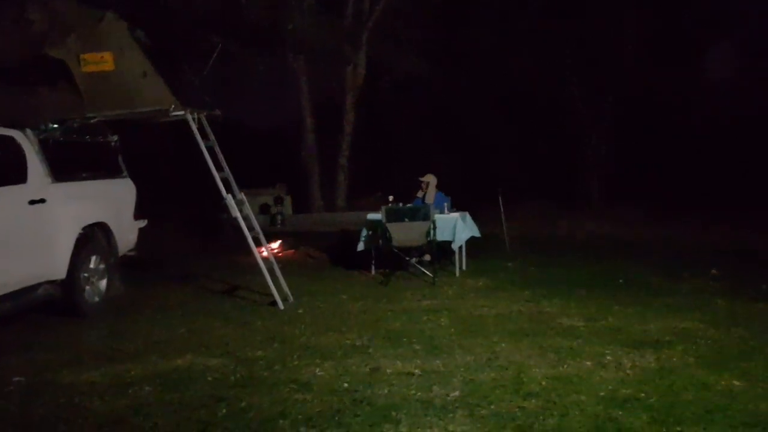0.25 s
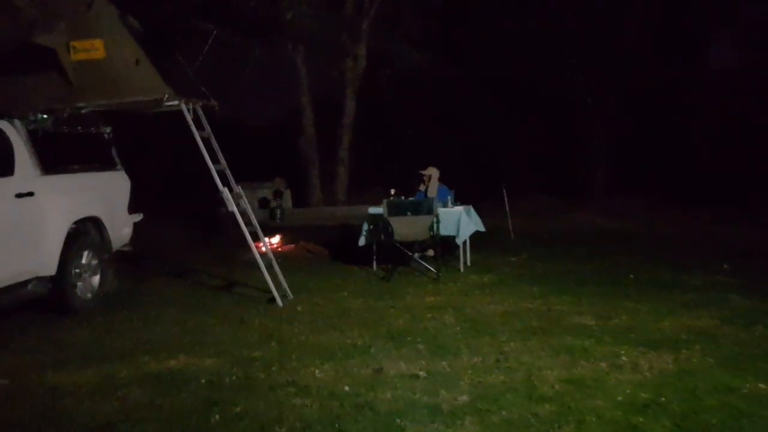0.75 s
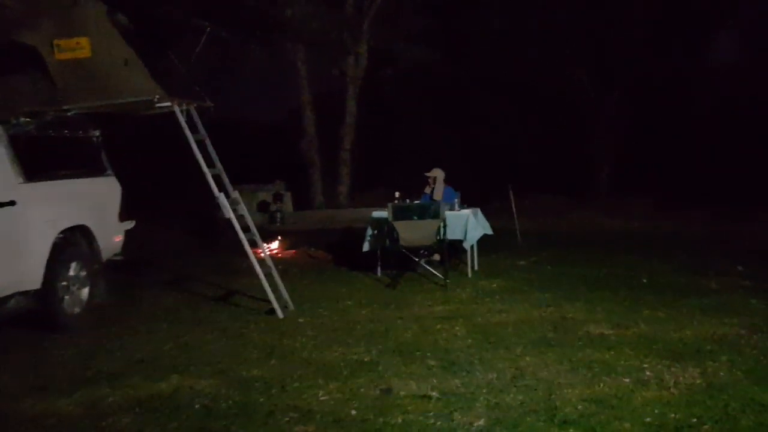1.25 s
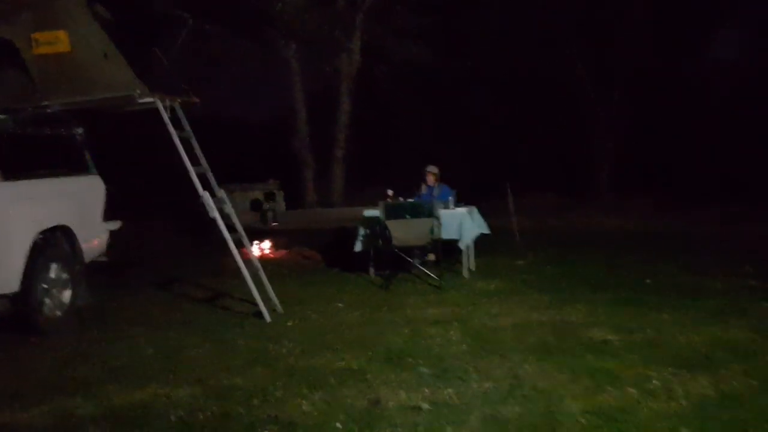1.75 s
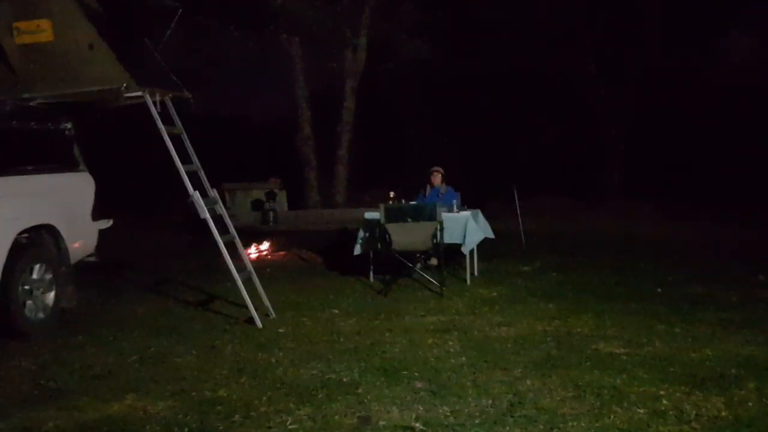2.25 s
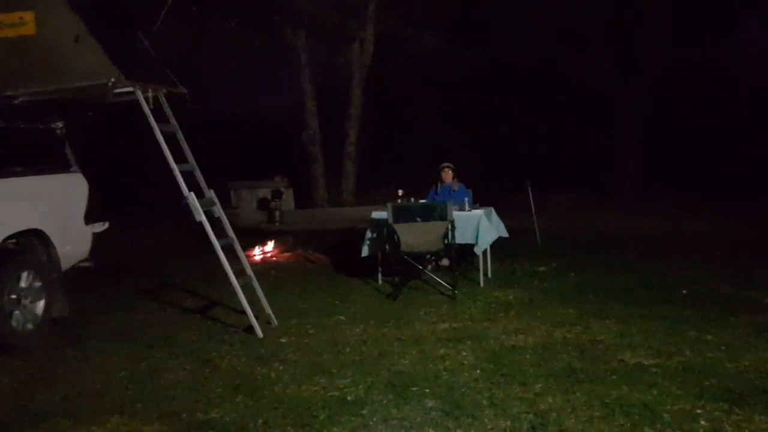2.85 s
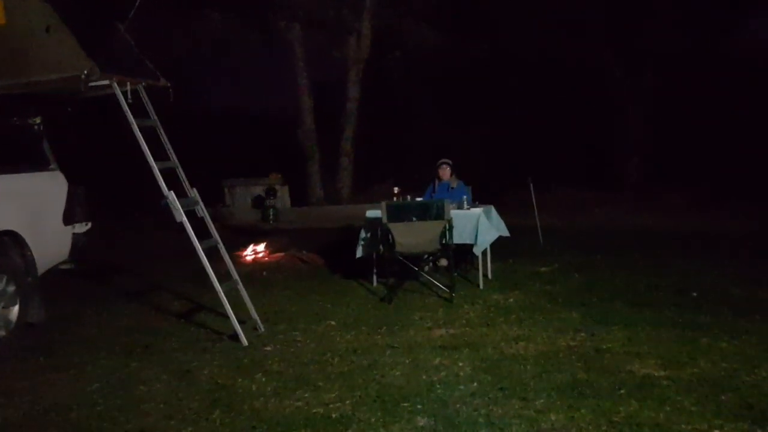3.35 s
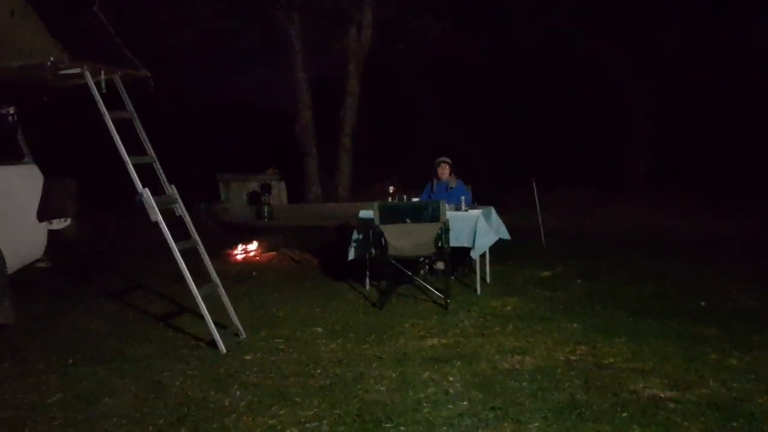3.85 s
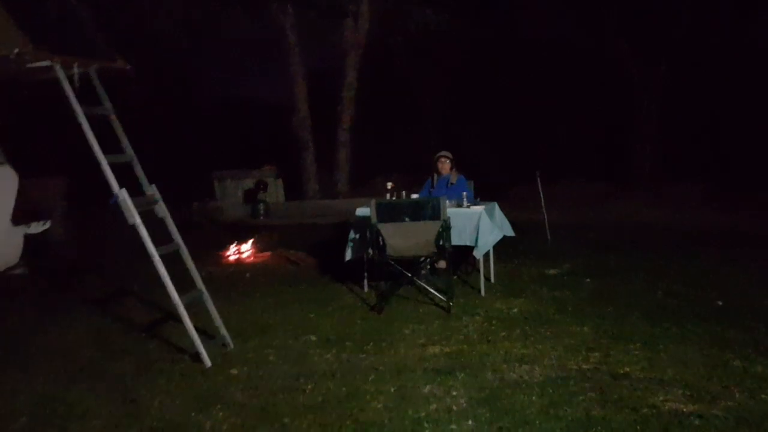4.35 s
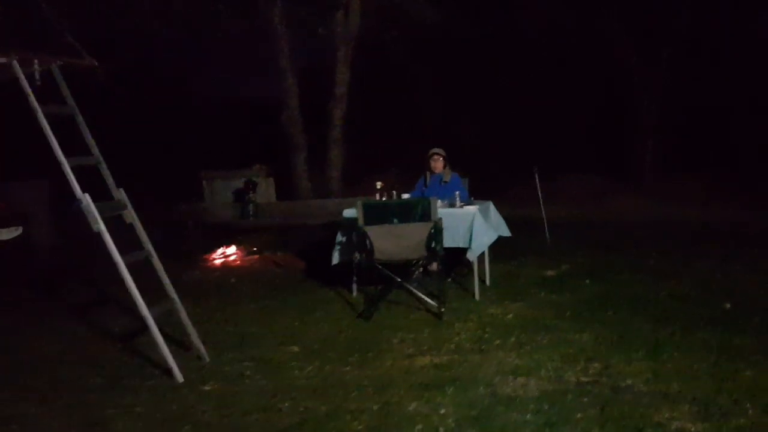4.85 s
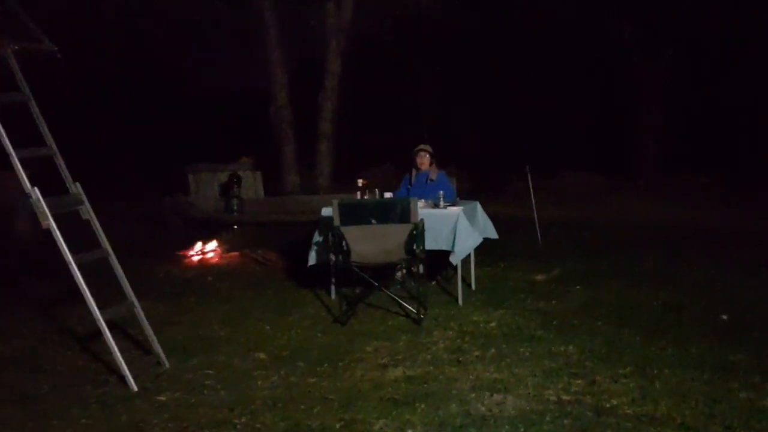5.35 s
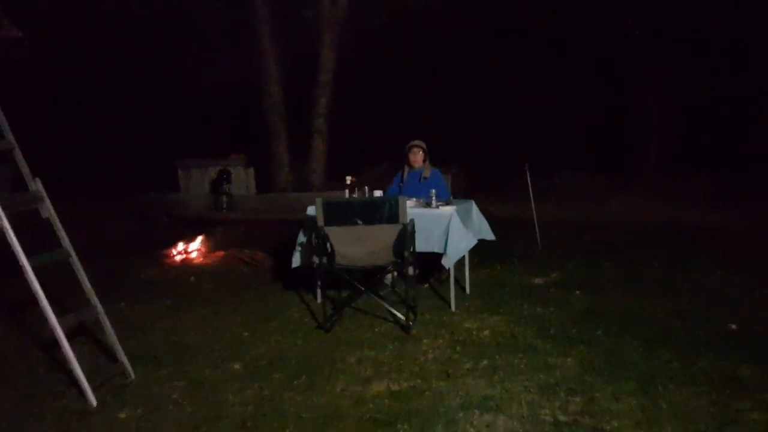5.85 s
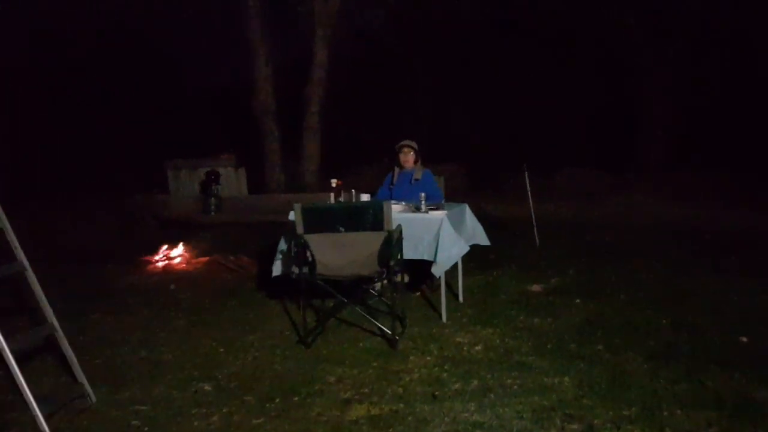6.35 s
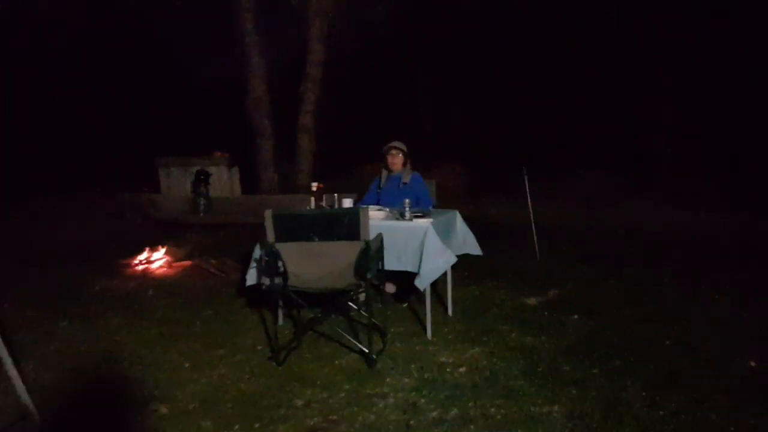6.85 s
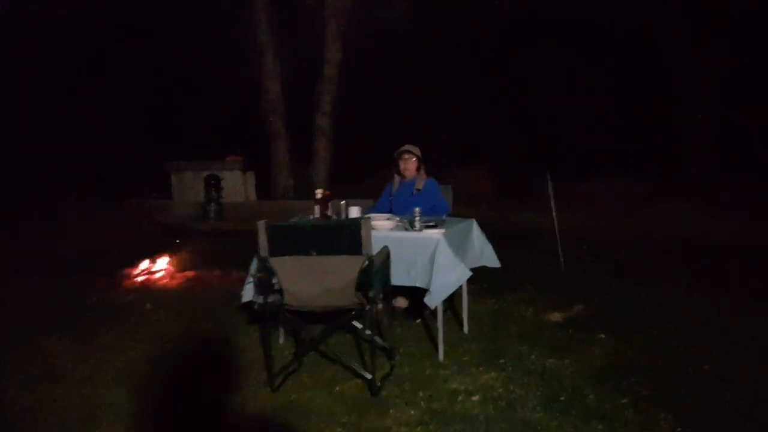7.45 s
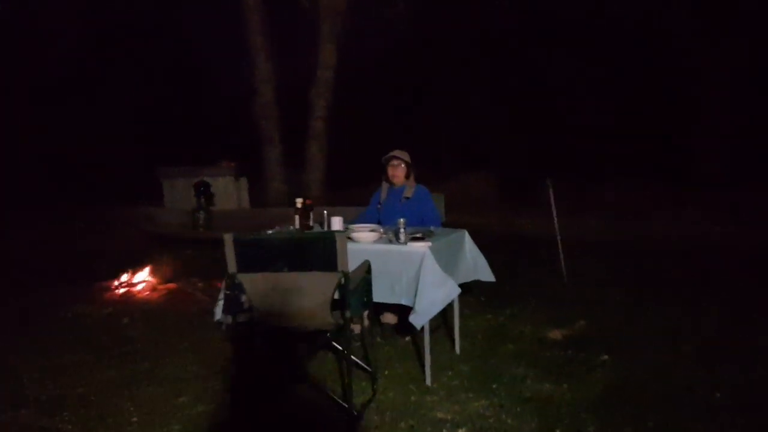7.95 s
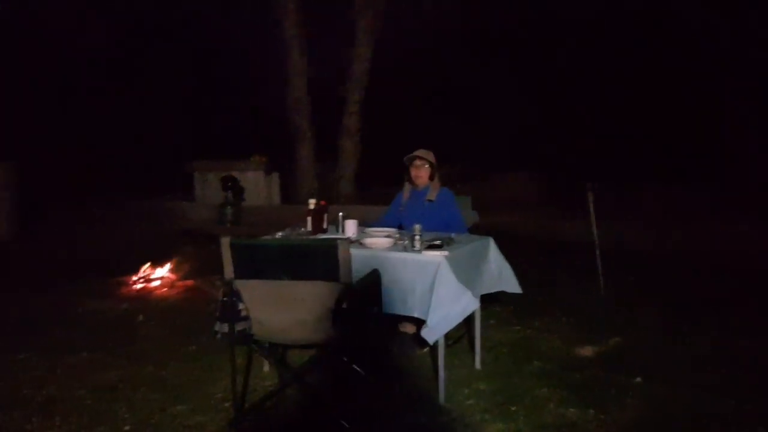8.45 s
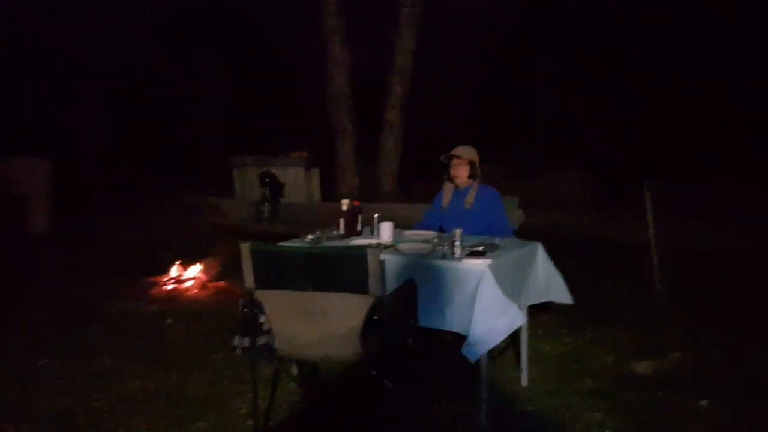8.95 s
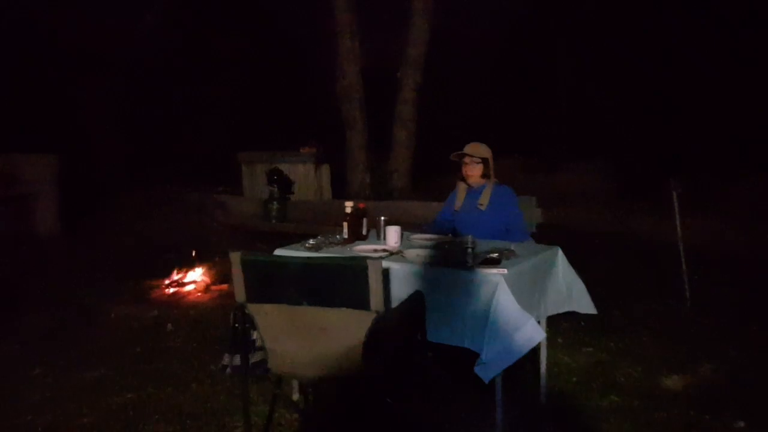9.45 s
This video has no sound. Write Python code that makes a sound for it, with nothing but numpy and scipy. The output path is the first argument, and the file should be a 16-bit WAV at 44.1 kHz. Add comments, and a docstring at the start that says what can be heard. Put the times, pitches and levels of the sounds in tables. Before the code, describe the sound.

Moving handheld stereo perspective in open grass near trees and a parked truck. Cricket song dominates: one close, steady, fast chirr with downward-sweeping strokes swells, leans left and recedes; a second gives roughly one trill burst per second until about five seconds. Regular soft chirps and a shimmering insect bed fill the night. Beneath are quiet irregular grass steps, occasional dry stalk clicks, small knocks and a very faint low engine hum.

```python
"""A near cricket sweeps its wings without pause as a listener walks past it on a lawn at a night camp in the bush.
Its fast falling tones reach both ears directly, off the ground and off a parked truck.
Another cricket trills in bursts of longer strokes; field crickets chirp, and random strokes make a chorus.
Noise grains make the grass rustle, short bursts snap, and decaying rings knock underfoot.
Far off a generator hums in wavering sines and puffing noise, over a bed of shaped night noise."""
import sys
import numpy as np
from scipy import signal
from scipy.fft import rfft, irfft
from scipy.io import wavfile
from scipy.ndimage import uniform_filter1d

SR = 44100
rng = np.random.default_rng(int(sys.argv[2]) if len(sys.argv) > 2 else 0)


def store_pcm(level_fs):
    """Save levels as 16-bit WAV."""
    pcm = np.round(np.clip(level_fs, -1, 1) * 32767).astype(np.int16)
    wavfile.write(sys.argv[1], SR, np.atleast_2d(pcm).T)


N = 427329

# Near cricket along the walk, before patchiness: (time [s], left level [dB], right level [dB],
# left late-minus-early stress [dB], right late-minus-early stress [dB])
NEAR_PATH = [(0.05, -36.5, -34, -4, -12), (.65, -36.5, -30.5, 0, -11.5), (.9, -35, -32, 2, -20),
             (1.15, -38, -26.5, 22, -11), (1.55, -37.5, -31.5, 15, -14.5), (1.899, -33.5, -30.5, 10, -9.5),
             (2.5, -29.5, -30.5, -8, -5), (2.95, -27, -29, 0, -11), (3.4, -30.5, -34.5, -5.5, 15),
             (3.85, -29.5, -28, -5, -4), (4.4, -26.5, -34.5, -7.5, 10), (4.8, -28, -32.5, -8, 10),
             (5.4, -26.5, -31, -1, -3.5), (5.8, -23.5, -39, -6.5, -9), (6.1, -23, -38, -8, 8),
             (6.4, -21.5, -48, -4.5, 13), (6.8, -27, -30.5, 4.5, 12), (7.3, -31, -36.5, -14, 10.5),
             (7.75, -33.5, -41, -6.5, 21), (8.05, -35, -29.5, -9, 0), (8.4, -40, -42, -14, 3.5),
             (9, -38, -41.5, -11, 10), (9.4, -43, -39.5, -10, 5), (9.69, -48, -53, -15, -4)]
# Near cricket's bounce off the ground: (time [s], delay [ms], level relative to direct sound [dB])
GROUND_BOUNCE = [(0, 4.5, -20), (1, 3.2, -14.5), (2.5, 2.3, -14), (3.5, 2.3, -10), (4.5, 3.6, -10),
                 (6, 1.2, -32), (7, 2.9, -7.5), (9.7, 1.5, -17)]
# Near cricket's echo off the parked truck: (time [s], delay [ms], level relative to direct sound [dB])
TRUCK_ECHO = [(0, 11, -14), (2.5, 12.5, -15), (5, 14.5, -17), (7, 16, -14), (8.5, 19, -11), (9.7, 20, -13)]
# Near cricket's beat before jitter, even in between: (stroke number [count], start [s])
NEAR_BEAT = [(0, .0345), (24, 1.0183), (48, 2.0022), (72, 2.988), (96, 3.9697), (120, 4.953), (144, 5.9388),
             (156, 6.4335), (168, 6.9265), (192, 7.9113), (216, 8.8968), (229, 9.43), (233, 9.573),
             (235, 9.654)]
# Quick, shallow strokes: (first stroke number [count], stroke number after the last [count])
FALTER_STROKES = (229, 233)
BEAT_JITTER_S = .0005  # standard deviation
FALL, FALTER_FALL = 0.24, 0.115  # share by which the pitch falls in a stroke
PATCH_DB, PATCH_RATE_HZ = 4, 7  # depth before smoothing, new levels per second
# Near cricket's second harmonic, before its fade and pan: (time [s], level [dB])
SECOND_HARMONIC = [(0, -61), (.6, -48.5), (2.25, -53), (3.45, -41.5), (4.3, -45.5), (5.45, -48), (5.9, -40),
                   (6.4, -40), (6.65, -43.5), (7.1, -38.5), (7.5, -46), (8.05, -54), (8.5, -49.5),
                   (9.45, -57), (9.69, -75)]
# Near cricket's direction: (time [s], left lag behind right [ticks])
NEAR_BEARING = [(0, 176), (1.45, 275), (1.65, 412), (3.5, 427), (5.75, 378), (6.45, 603), (9.7, 538)]
# Ear-lag ticks, each close to a microsecond
NEAR_TICKS_PER_S, TRILL_TICKS_PER_S, CHIRP_TICKS_PER_S = 999500.0, 1040000.0, 936000.0

# Trilling cricket's bursts: (start [s], span from first to last stroke start [s])
TRILL_BURSTS = [(-.296, 0.75), (0.805, .674), (1.805, .745), (2.849, 0.69), (3.821, .735), (4.779, 0.47)]
# Trilling cricket as it is left behind: (time [s], level [dB], left minus right [dB],
# left lag behind right [ticks])
TRILL_PASSING = [(0, -33.5, 3, 335), (.45, -38, 1, 390), (1.1, -37.5, -1, 420), (1.9, -35.5, 0, 436),
                 (2.55, -36, 5, 430), (3.1, -37, 7, 440), (3.55, -46, 6, 400), (3.8, -40, 5, 280),
                 (4.2, -42, 4, 290), (4.35, -49, 8, 290), (5.2, -52, 5, 210)]
# Strokes start quick and soft, then settle; gaps are stretched slightly to fill each burst
TRILL_GAP_S, TRILL_HURRY_S = .061, .015
TRILL_SETTLE_STROKES, TRILL_SOFT_DB = 4.4, -2

# Field crickets' clearest chirps: (start [s], span from first to last stroke start [s],
# middle pitch [Hz], level [dB], left minus right [dB], left lag behind right [ticks])
FIELD_CHIRPS = [(-.02, 0.03, 3270, -42.5, 2, -64), (0.094, 0.03, 2490, -49, 1, 10),
                (0.128, 0.12, 3570, -45.5, 12, -30), (0.361, 0.091, 3240, -38.5, 2, -50),
                (0.524, 0.12, 3580, -42.5, 7, -20), (0.664, 0.084, 3316, -35, 0, 52),
                (.79, .094, 3280, -38, 2, -46), (0.935, 0.12, 3570, -43, 7, -20),
                (1.115, 0.078, 3350, -40, 6, 7), (1.262, 0.089, 3325, -36, 6, -62),
                (1.361, 0.069, 3640, -46, 10, -60), (1.426, 0.052, 2520, -50, 0, -30),
                (1.48, 0.099, 3370, -39, 5, 44), (1.609, .122, 3150, -33, 3, 47),
                (1.752, 0.072, 3530, -47, 8, 0), (1.887, .071, 3370, -38.5, 4, 22),
                (1.996, 0.093, 3290, -35.5, 1, -60), (2.107, 0.1, 3600, -44.5, 6, -87),
                (2.289, 0.066, 3350, -39, 4, 27), (2.388, 0.026, 3260, -37, 3, -50),
                (2.433, 0.14, 3120, -31.5, 0, 35), (2.553, 0.13, 3580, -47, 3, -30),
                (2.688, .114, 3320, -39.5, 9, 39), (2.937, 0.097, 3570, -41.5, 2, -65),
                (3.063, 0.15, 3123, -35, -1, 0), (3.084, .113, 3360, -39, 7, 5),
                (3.375, 0.053, 3560, -41, 1, -70), (3.475, 0.15, 3310, -37.5, 5, 65),
                (3.758, 0.15, 3120, -33.5, -3, -63), (3.799, 0.094, 3580, -43, 2, -50),
                (3.903, .113, 3340, -37, 7, 70), (4.162, 0.1, 3600, -45, -1, 0),
                (4.304, 0.12, 3313, -37, 7, 95), (4.55, .092, 2560, -53, 2, -100),
                (4.561, 0.081, 3127, -37.5, 1, -65), (4.614, 0.032, 3560, -43, -2, 0),
                (4.704, 0.13, 3306, -36, 3, 94), (5.151, .142, 3275, -36.5, 4.5, 85),
                (5.283, .098, 3640, -44.5, 6, 0), (5.385, 0.034, 2500, -48, -3, -155),
                (5.4, .03, 3190, -40, -4, -133), (5.569, 0.15, 3260, -36, 5.5, 88),
                (5.724, 0.044, 3680, -44, 0, -62), (5.981, 0.16, 3340, -35.5, 2, 95),
                (6.065, 0.029, 3720, -44, 1, -60), (6.408, .141, 3360, -36, 0, 120),
                (6.453, 0.096, 3670, -43, -1, 50), (6.768, 0.039, 3690, -47, 9, -60),
                (6.822, .14, 3340, -34, 1.5, 140), (6.9, .03, 3080, -42, 4.5, 131),
                (6.997, 0.14, 2460, -53, 2, 60), (7.164, 0.12, 3710, -44, 4, -30),
                (7.272, 0.12, 3350, -34, 1.5, -147), (7.365, .034, 2500, -50.5, -7, -50),
                (7.364, .03, 3080, -40.5, 6, 135), (7.632, .099, 3670, -44, 12, -110),
                (7.657, .14, 3323, -33, 5.5, 137), (7.827, 0.053, 3340, -42.5, 8, -35),
                (8.097, 0.14, 3327, -34, 8, 112), (8.131, 0.095, 3000, -46, -3, 110),
                (8.404, 0.042, 2500, -49, -2, 0), (8.473, .07, 3704, -40.5, -1, 20),
                (8.528, .143, 3360, -32.5, 3, 104), (8.578, .031, 3070, -40, -4, 118),
                (8.827, .099, 3640, -48, 9, 0), (8.927, 0.15, 3320, -34, 3, 77),
                (9.18, 0.066, 3700, -46, 8, 66), (9.328, 0.037, 2494, -52, -4, 7),
                (9.387, 0.035, 3080, -40.5, 1, 96), (9.346, 0.14, 3370, -34.5, 1, 99),
                (9.56, 0.11, 3670, -41.5, 6, 86)]
# Pitch fall of each kind of field cricket: (middle pitch [Hz], fall in a stroke [share])
PITCH_FALL = [(2500, 0.033), (3100, 0.037), (3200, 0.04), (3330, 0.13), (3450, 0.066), (3600, 0.032)]
CHIRP_GAP_S = .035  # sets the stroke count
# Gaps widen; the first strokes are soft and flat
CHIRP_SLOWING, CHIRP_SOFT_DB, CHIRP_FLAT = .1, -5.5, 0.025
# Unseen chorus: (start pitch [Hz], pitch spread [share], pitch fall [share], stroke length [s],
# density per ear [strokes/s], typical stroke level [dB])
CHORUS_VOICES = [(2559, 0.0307, 0.034, 0.055, 16, -56), (3703, 0.022, 0.031, 0.023, 33, -56.5),
                 (3370, 0.031, 0.1043, 0.02676, 130, -49), (4430, 0.0248, 0.084, 0.0317, 44, -61),
                 (6400, 0.0327, 0.272, 0.0174, 390, -54), (6950, 0.0275, 0.08, 0.021, 76, -59),
                 (7334, 0.0482, 0.17, 0.01337, 200, -52.5)]

# Feet brushing grass: (time [s], relative level [dB], fade, negative swells [dB/s],
# time until the foot lifts [s])
GRASS_STEPS = [(0, -59, 98, 0.014), (0.247, -61, 26, .15), (0.477, -57, 13, .15), (0.64, -58, 63, .07),
               (0.751, -54, 58, .12), (0.9, -56.5, 150, .06), (0.972, -66, 5, 0.34), (1.69, -54, 150, 0.15),
               (1.84, -58.5, 35, 0.26), (2.13, -57, 50.5, 0.22), (2.392, -52.5, 86, 0.076),
               (2.502, -60, 7.5, 0.58), (3.322, -56.5, 104, .05), (3.4, -63.5, 9, .35),
               (3.79, -55.5, 33, .2), (3.998, -62, -7, .29), (4.385, -66, -4, .15), (4.59, -64, 30, 0.1),
               (4.904, -58.5, 10, 0.12), (5.043, -62, 31, 0.26), (5.328, -57.5, 74, .12),
               (5.498, -64, 18, .13), (5.677, -59.5, 45, 0.29), (5.82, -67, -13, 0.49),
               (6.447, -57, 27, 0.24), (6.758, -64, 2, .1), (6.884, -58, 115, 0.15),
               (7.237, -58.5, 58, 0.16), (7.407, -60.5, 68, .14), (7.606, -61.5, 50, .13),
               (7.926, -58, 38, 0.28), (8.29, -64.5, 9, 0.14), (8.646, -56, 105, .05),
               (8.72, -60.5, 18, 0.47), (9.57, -57.5, 65, 0.11)]
# Body of the rustle: (frequency [Hz], relative density [dB per Hz])
GRASS_SPECTRUM = [(300, -13), (450, -15), (850, 2), (1300, 4), (2300, 7), (3000, 6.5), (3900, 5.5),
                  (4800, 2), (6000, -9.5)]
# Treble from dry tips: (frequency [Hz], relative density [dB per Hz])
BLADE_SPECTRUM = [(4000, -23), (6000, 10), (9000, -2.5), (12500, -3), (16000, -19)]
TIPS_DB, TIPS_FOLLOW = -54.5, 0.23  # level before pan; treble follows the rustle only a little
STEP_RISE_DB_S, LIFT_DB_S, STILL_DB = 155, 159, -80  # the floor is relative, like the steps
# Sharp stalk snaps: (time [s], peak before pan [dB], left minus right [dB])
STALK_SNAPS = [(2.8893, -29, 16), (3.108, -31, 11), (3.1318, -31, 16), (4.0138, -37, 7), (4.0951, -50, 3.0),
               (6.3975, -32, 16), (7.1706, -22, 12), (8.0726, -28, 12)]
# Dull knocks: (time [s], level of the main ring before pan [dB], ring [Hz], t60 [s],
# left minus right [dB])
DULL_KNOCKS = [(0.209, -51.5, 75.5, 0.1, 24), (0.209, -65, 330, 0.094, 12), (0.296, -63.5, 148, 0.1, 15),
               (0.434, -45, 1080, 0.079, 4), (0.467, -45.5, 910, 0.095, 4), (0.884, -37.5, 1118, 0.022, -1),
               (3.718, -52.5, 61.9, 0.087, 9.5), (3.897, -48, 1770, 0.047, 4.5),
               (4.172, -49.5, 1250, 0.057, 7), (6.226, -42, 2210, 0.035, 0.5), (6.397, -45, 2240, 0.073, 6),
               (6.397, -51.5, 96.9, 0.094, 4), (6.874, -46.5, 1290, 0.05, 6),
               (7.216, -51.5, 1220, 0.039, 6), (9.209, -57, 146, 0.089, 2.5)]

# Generator lines before approach gain and waver: (frequency [Hz], rms [dB])
GENERATOR_LINES = [(48.4, -73.5), (96.9, -71), (145.3, -78.5), (285.3, -88)]
# Approach to the generator: (time [s], hum gain [dB])
HUM_APPROACH = [(0, -4.5), (2, -1.5), (3.5, 0.5), (6.5, 4), (8, 1), (9.7, 2)]
# Exhaust noise: (frequency [Hz], relative density [dB per Hz])
EXHAUST_SPECTRUM = [(80, -44), (140, 1), (200, -9.5), (320, -7.5), (450, -13), (900, -33)]
# Exhaust noise before pan: (time [s], rms [dB])
EXHAUST_LEVEL = [(0.0, -79), (1.38, -80), (2.1, -75), (2.99, -75.5), (3.64, -73.5), (6.23, -72.5),
                 (6.37, -70.5), (8.23, -73), (8.42, -76), (9.07, -68), (9.69, -79)]
# Night bed: (frequency [Hz], relative density [dB per Hz])
NIGHT_SPECTRUM = [(20, -41), (45, -0.5), (100, -2), (160, -16.5), (230, -23.5), (450, -21.5), (1000, -30.5),
                  (1900, -20), (2500, -9.5), (3300, -7.5), (3900, -21.5), (4700, -6.5), (6000, -2),
                  (8300, -36), (12500, -17), (16000, -46)]
NIGHT_DB = -54  # before waver and pan
TOP_HZ = 15900


def undb(db):
    """Turn a level in dB into an amplitude gain."""
    return 10 ** (np.asarray(db, float) / 20)


def colour(x, points):
    """Filter noise to a spectrum drawn on log frequency, with overall rms 1."""
    hz, db = np.transpose(points)
    f = np.arange(N // 2 + 1) * SR / N
    gain = undb(np.interp(np.log(f + 1), np.log(hz), db))
    y = irfft(rfft(x) * gain, N)
    return y / np.sqrt(np.mean(y ** 2))


def pair(alike):
    """Make left and right noise that share part of their power."""
    shared = np.clip(alike, 0, 1)
    return np.sqrt(shared) * rng.standard_normal(N) + np.sqrt(1 - shared) * rng.standard_normal((2, N))


def walk(rate):
    """Hold random levels for 1 / rate seconds and smooth them twice."""
    hold = int(SR / rate)
    steps = np.repeat(rng.standard_normal(N // hold + 1), hold)
    return uniform_filter1d(uniform_filter1d(steps, hold), hold)[:N]


def add(out, s, sound):
    """Mix a two-channel sound in at time s."""
    i = max(int(s * SR), 0)
    n = min(sound.shape[1], N - i)
    out[:, i:i + n] += sound[:, :n]


def sides(pan_db):
    """Split a left-minus-right level into two gains."""
    return undb([[pan_db / 2], [-pan_db / 2]])


def stroke(hz, fall, length, bend, lag, turn):
    """Give progress 0-1 and phase of a wing stroke per ear: the pitch falls as the wings close."""
    delay = np.array([[max(lag, 0)], [max(-lag, 0)]])
    t = np.arange(int((length + .001) * SR)) / SR - delay
    u = np.clip(t / length, 0, 1)
    cycles = hz * length * (u - fall * u ** (bend + 1) / (bend + 1))
    return u, 2 * np.pi * (cycles + turn)


def near_cricket():
    """Wing strokes make fast falling sweeps with a second harmonic; two reflections return the sweep."""
    out, path = np.zeros((2, N)), np.transpose(NEAR_PATH)
    number = np.arange(NEAR_BEAT[-1][0] + 1)
    chance = rng.standard_normal((len(number), 6))
    starts = np.interp(number, *np.transpose(NEAR_BEAT)) + BEAT_JITTER_S * chance[:, 5]
    # bushes and ground dent the sweep early, midway and late, differently in each ear
    dents = PATCH_DB * np.array([walk(PATCH_RATE_HZ) for _ in range(6)]).reshape(2, 3, N)
    # they shift the stress, not the loudness
    dents -= 20 * np.log10(np.mean(undb(dents), axis=1, keepdims=True))
    for k, s, c in zip(number, starts, chance):
        level, stress = np.reshape([np.interp(s, path[0], v) for v in path[1:]], (2, 2, 1))
        db = level + stress * [-.5, 0, .5] + dents[:, :, int(s * SR)]
        fall = FALTER_FALL if FALTER_STROKES[0] <= k < FALTER_STROKES[1] else FALL
        lag = np.interp(s, *np.transpose(NEAR_BEARING)) / NEAR_TICKS_PER_S
        u, phase = stroke(6350 * (1 + 0.0049 * c[0]), fall, 0.015, 1.55, lag, c[1])
        edge = np.clip(u / 0.2, 0, 1) * np.clip((1 - u) / 0.045, 0, 1)
        shape = np.array([np.interp(u[ear], [.2, .5, .8], db[ear]) for ear in range(2)])
        tone = edge * undb(shape + 0.21 * c[2:4, None]) * np.sin(phase)
        # the overtone favours the start, while the wings move fastest
        overtone_gain = undb(np.interp(s, *np.transpose(SECOND_HARMONIC))) * sides(8.8)
        overtone = edge * (1 - u) ** 1.42 * overtone_gain * np.sin(2 * phase)
        add(out, s, tone + overtone)
        for when, ms, echo_db in map(np.transpose, (GROUND_BOUNCE, TRUCK_ECHO)):
            # reflections swap ears
            back = tone[::-1] * undb(np.interp(s, when, echo_db) + 0.7 * c[4])
            add(out, s + np.interp(s, when, ms) / 1e3, back)
    return out


def trilling_cricket():
    """Longer, flatter wing strokes with a third harmonic gather into bursts."""
    out, path, k = np.zeros((2, N)), np.transpose(TRILL_PASSING), np.arange(20)
    settle = np.exp(-k / TRILL_SETTLE_STROKES)
    after = np.append(0, np.cumsum(TRILL_GAP_S - TRILL_HURRY_S * settle))
    chances = rng.standard_normal((len(TRILL_BURSTS), 20, 4))
    for (start, length), chance in zip(TRILL_BURSTS, chances):
        last = np.argmin(abs(after - length))
        starts = start + after[:last + 1] * length / after[last]
        for s, early, c in zip(starts, settle, chance):
            db, pan_db, lag = (np.interp(s, path[0], v) for v in path[1:])
            u, phase = stroke(4480 * (1 + 0.0022 * c[0]), 0.12, 0.029, 2.53, lag / TRILL_TICKS_PER_S, c[1])
            level = undb(db + TRILL_SOFT_DB * early ** 2 + 1.6 * c[2])
            gain = (s > 0) * level * sides(pan_db + 1.2 * c[3])
            tone = np.sin(phase) + undb(-19.5) * np.sin(3 * phase)
            add(out, s, np.sin(np.pi * u) ** 1.3 * gain * tone)
    return out


def field_crickets():
    """Two to six soft wing strokes make each chirp; its pitch sets how far the strokes glide."""
    out = np.zeros((2, N))
    chances = rng.standard_normal((len(FIELD_CHIRPS), 6, 4))
    for (start, length, hz, db, pan_db, lag), chance in zip(FIELD_CHIRPS, chances):
        k = np.arange(max(round(length / CHIRP_GAP_S), 1) + 1)
        after = k + CHIRP_SLOWING * k ** 2 / 2
        starts = start + length * after / after[-1]
        earliness = np.exp(-k) * k[-1] / 4  # stronger in longer chirps
        fall = np.interp(hz, *np.transpose(PITCH_FALL))
        for s, early, c in zip(starts, earliness, chance):
            pitch = hz * (1 + 0.264 * fall - CHIRP_FLAT * early + 0.0029 * c[0])
            u, phase = stroke(pitch, fall, 0.02875, 2.105, lag / CHIRP_TICKS_PER_S, c[1])
            level = undb(db + CHIRP_SOFT_DB * early + 0.85 * c[2])
            gain = (s > 0) * level * sides(pan_db + 1.7 * c[3])
            add(out, s, np.sin(np.pi * u) ** 1.27 * gain * np.sin(phase))
    return out


def chorus():
    """Many distant singers' wing strokes overlap at random, at three pitches per voice."""
    out = np.zeros((2, N))
    for hz, spread, fall, length, rate, db in CHORUS_VOICES:
        u, phase = stroke(hz, fall, length, 1.422, 0., 0.)
        for pitch in 1 + spread * np.linspace(-1, 1, 3):
            happens = rng.random((2, N)) < rate / 3 / SR
            starts = happens * undb(db + 2.45 * rng.standard_normal((2, N)))
            tone = np.sin(np.pi * u) * np.sin(pitch * phase)
            out += signal.oaconvolve(starts, tone, axes=1)[:, :N]
    return out


def trees(dry, t60, wet_db):
    """Trunks and leaves scatter the songs into a short tail, different in each ear."""
    t = np.arange(SR // 2) / SR
    decay = np.exp(-np.log(1000) * t / t60) * np.clip(t / 0.0012, 0, 1)
    tail = rng.standard_normal((2, len(t))) * decay
    tail *= undb(wet_db) / np.sqrt(np.sum(tail ** 2, axis=1, keepdims=True))
    return dry + signal.oaconvolve(dry, tail, axes=1)[:, :N]


def feet():
    """Grass blades brush and crack as dense noise grains; the dry tips give the treble."""
    t, power = np.arange(0, N, 64) / SR, undb(STILL_DB) ** 2
    for s, db, fade_db, lasts in GRASS_STEPS:
        early, late = np.maximum(s - t, 0), np.maximum(t - s, 0)
        lifted = np.maximum(late - lasts, 0)
        step_db = db - STEP_RISE_DB_S * early - fade_db * late - LIFT_DB_S * lifted
        power = power + undb(step_db) ** 2
    gain = np.interp(np.arange(N) / SR, t, np.sqrt(power))
    grains = undb(2.5 * np.minimum(rng.exponential(size=N), 6))
    low = colour(pair(0.61) * grains, GRASS_SPECTRUM) * undb(7.0) * gain
    tips_gain = undb(TIPS_DB) * (gain / undb(-63.5)) ** TIPS_FOLLOW
    high = colour(pair(0.049) * grains, BLADE_SPECTRUM) * tips_gain * sides(2.76)
    return sides(4.05) * (low + high)


def snaps_and_knocks():
    """Dry stalks crack in milliseconds of noise; heavier things ring briefly with a noisy scrape."""
    out, t = np.zeros((2, N)), np.arange(SR // 8) / SR
    for s, db, pan_db in STALK_SNAPS:
        burst = np.clip(t / .0003, 0, 1) * (np.exp(-t / .0015) + .1 * np.exp(-t / .005))
        # mostly shared noise; differencing brightens it
        noise = rng.standard_normal((2, len(t) + 1)) * 0.11 + rng.standard_normal(len(t) + 1)
        crack = np.diff(noise) * burst
        add(out, s, crack / np.abs(crack).max() * undb(db) * sides(pan_db))
    for s, db, hz, t60, pan_db in DULL_KNOCKS:
        fade = np.exp(-np.log(1000) * t / t60)
        # the ring has a weaker, higher mode
        ring = np.sin(2 * np.pi * hz * t) + 0.32 * np.sin(2 * np.pi * 2.6 * hz * t)
        band = signal.butter(2, [hz / 1.4, hz * 2.2], "bandpass", fs=SR)
        grit = signal.lfilter(*band, rng.standard_normal(len(t)))
        # a broad scrape around the ring; its own fade multiplies the shared one below
        scrape = 1.27 * fade ** 0.83 * grit / grit.std()
        add(out, s, fade * (ring + scrape) * undb(db) * sides(pan_db))
    return out


def generator():
    """Firing-rate lines waver and grow on approach, while exhaust noise puffs once a cycle."""
    t = np.arange(N) / SR
    turns = np.cumsum(1 + 0.0248 * walk(6)) / SR  # time warped by an unsteady speed
    lines = 0
    for hz, db in GENERATOR_LINES:
        lines = lines + np.sqrt(2) * undb(db + 3.2 * walk(12)) * np.sin(2 * np.pi * hz * turns)
    hum = lines * undb(np.interp(t, *np.transpose(HUM_APPROACH)))
    puffs = 1 + .5 * np.cos(2 * np.pi * GENERATOR_LINES[0][0] * turns)
    exhaust_gain = undb(np.interp(t, *np.transpose(EXHAUST_LEVEL)))
    exhaust = colour(pair(0.68) * puffs, EXHAUST_SPECTRUM) * exhaust_gain
    return (hum + exhaust) * sides(1.3)


def night_air():
    """A shaped noise bed drifts slowly in level behind the other sounds."""
    return colour(pair(0.59), NIGHT_SPECTRUM) * undb(NIGHT_DB + 2.9 * walk(1.62)) * sides(1.9)


def scene():
    """Mix songs among the trees, the walker close by and the night behind."""
    field = trees(field_crickets(), t60=.2, wet_db=-9)
    close = trees(near_cricket() + trilling_cricket(), t60=0.04, wet_db=-11)
    songs = close + field + chorus()
    return songs + feet() + snaps_and_knocks() + generator() + night_air()


def record(dry):
    """Cut the top treble with a steep elliptic low-pass."""
    low_pass = signal.ellip(10, .2, 80, TOP_HZ, fs=SR, output="sos")
    return signal.sosfilt(low_pass, dry)


dry = scene()
out = record(dry)
store_pcm(out)
```